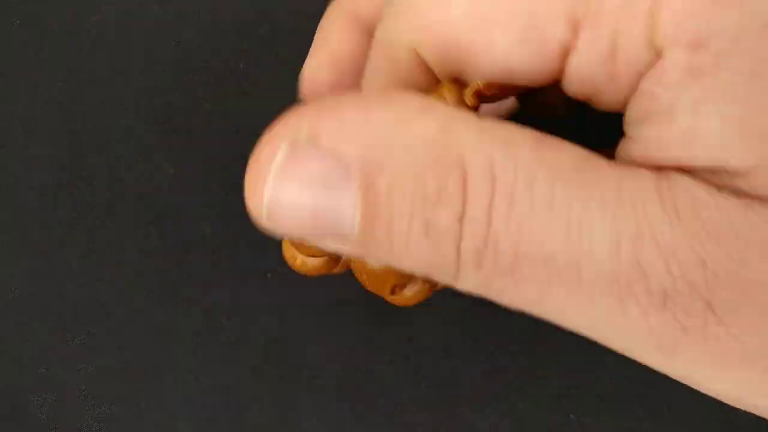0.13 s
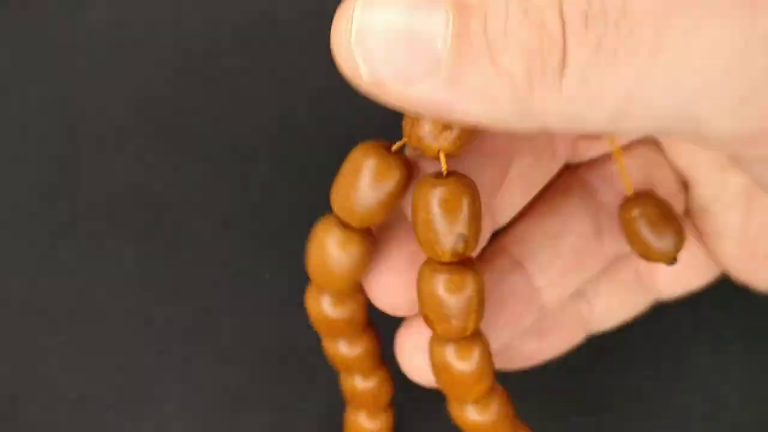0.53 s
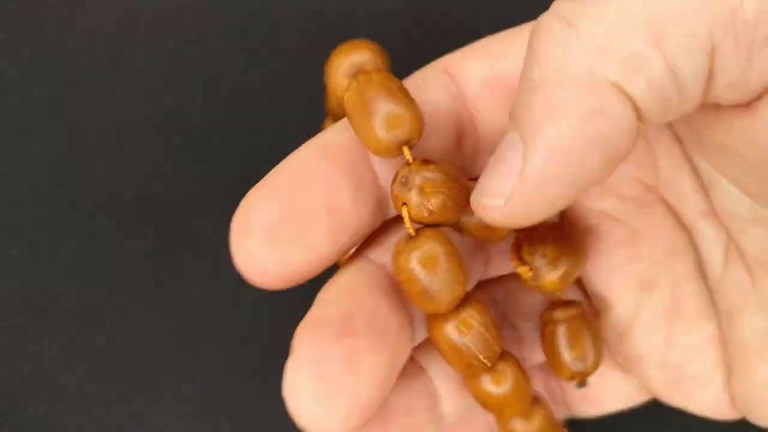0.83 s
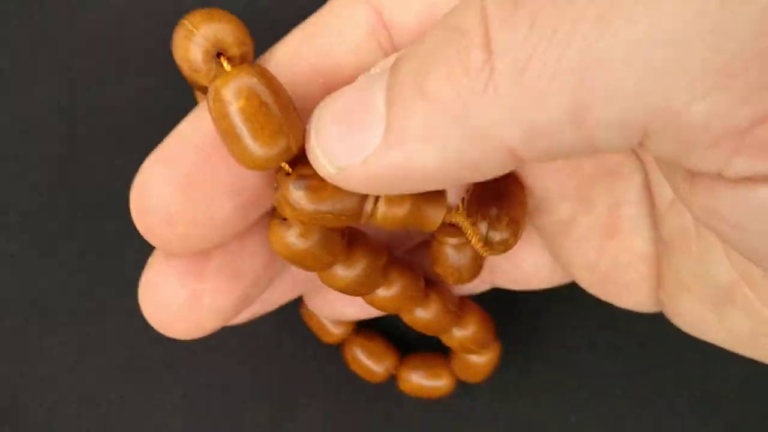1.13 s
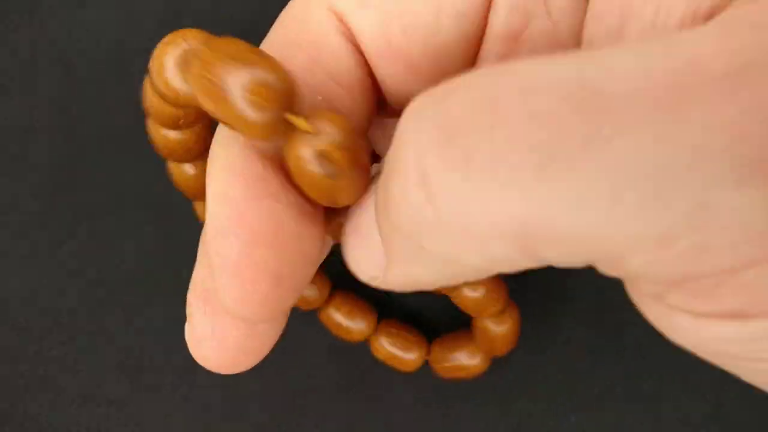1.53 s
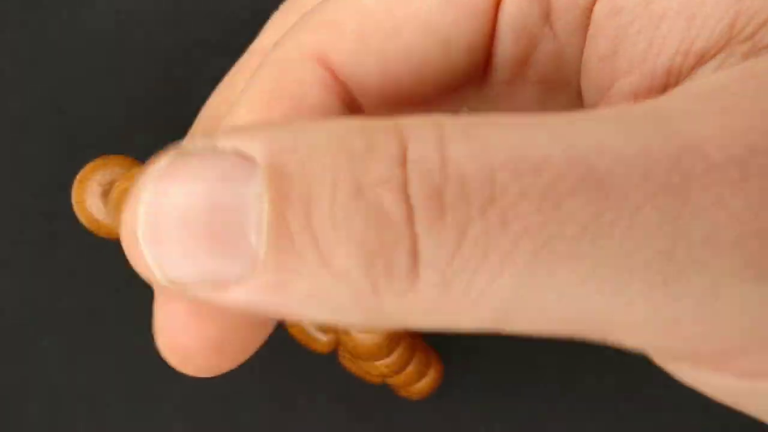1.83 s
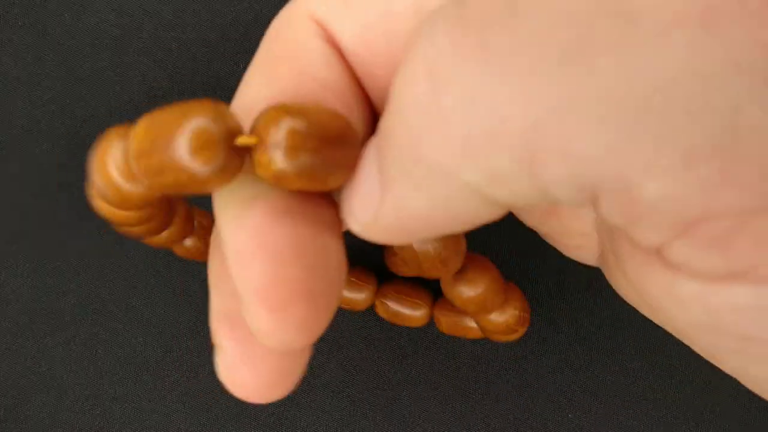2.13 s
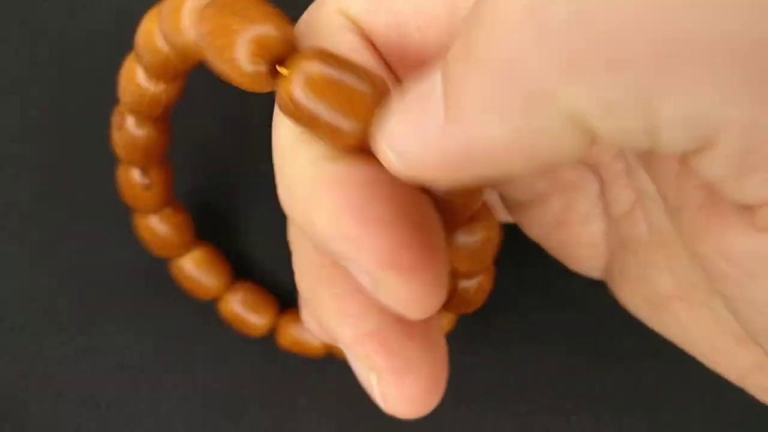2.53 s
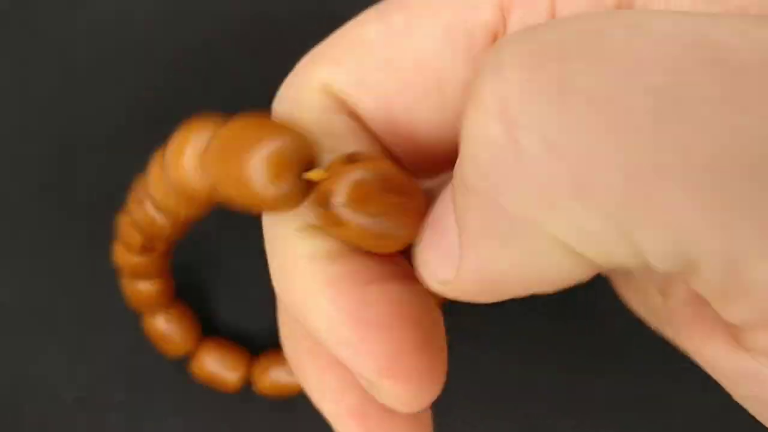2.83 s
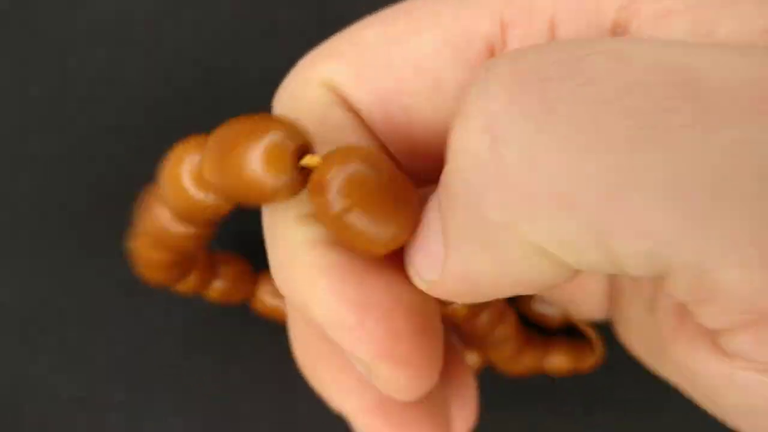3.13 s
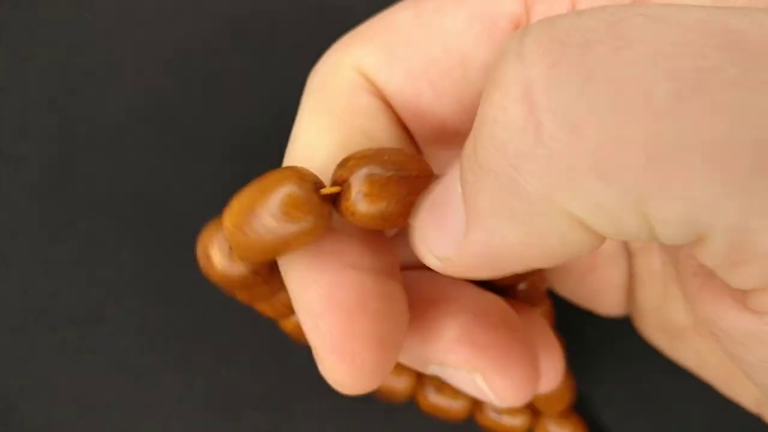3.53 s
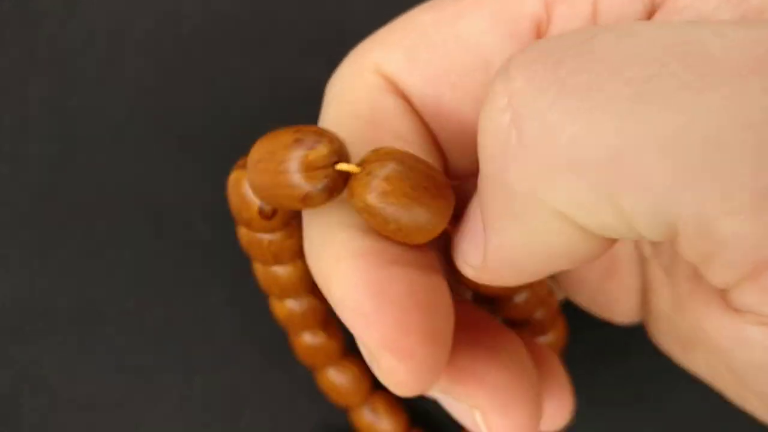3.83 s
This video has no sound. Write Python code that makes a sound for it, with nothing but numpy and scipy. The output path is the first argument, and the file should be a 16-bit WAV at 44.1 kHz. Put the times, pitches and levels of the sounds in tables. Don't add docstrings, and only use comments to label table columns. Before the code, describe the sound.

Polished wooden prayer beads click sharply and irregularly as fingers slide them along a cord.

```python
import sys
import numpy as np
from scipy import signal
from scipy.fft import rfft, irfft, next_fast_len
from scipy.io import wavfile
from scipy.ndimage import map_coordinates

SR = 44100
rng = np.random.default_rng(int(sys.argv[2]) if len(sys.argv) > 2 else 0)


def magnitude_from_level(level_db):
    exponent = np.asarray(level_db, float) / 20
    return 10 ** exponent


def waveform_to_disk(signal):
    frames = np.transpose(np.atleast_2d(signal))
    scaled = np.clip(frames, -1, 1) * 32767
    samples = np.round(scaled).astype(np.int16)
    wavfile.write(sys.argv[1], SR, samples)


N = 176400


def unit(x):
    return x / np.sqrt(np.mean(x ** 2) + 1e-20)


def along(points, hz):
    f, v = np.transpose(points)
    return np.interp(np.log(hz + 1), np.log(f + 1), v)


def wobble(rate):
    knots = rng.standard_normal(int(N * rate / SR) + 4)
    return map_coordinates(knots, [np.arange(N) * rate / SR])


def filtered(x, response):
    m = next_fast_len(N + 8192)
    return irfft(rfft(x, m) * response(np.fft.rfftfreq(m, 1 / SR)), m)[..., :N]


def sides(pan_db):
    return magnitude_from_level(np.array([pan_db / 2, -pan_db / 2]))


def resonances(f, modes):
    total = 0
    for k, (centre, width, db) in enumerate(modes):
        damping = 1j * f * width
        total = total + (-1) ** k * magnitude_from_level(db) * damping / (centre * centre - f * f + damping)
    return total


# f/Hz, level/dB
AIR_COLOUR = [(150, -37.5), (250, -3), (351, -19.5), (692, -7.5), (1920, -8.5), (3090, -9.5), (5310, -20.5),
              (10000, -23), (13000, -58.5), (22000, -120)]
# f/Hz, left over right level/dB
AIR_BALANCE = [(300, 1), (1300, -3.5), (2400, 3), (8000, 2)]


def room_air():
    shared, left, right = rng.standard_normal((3, N))
    alike = 0.2
    common, own = np.sqrt(alike), np.sqrt(1 - alike)
    pair = np.array([common * shared + own * left, common * np.roll(shared, 8) + own * right])
    hush = filtered(pair, lambda f: magnitude_from_level(along(AIR_COLOUR, f)) * sides(along(AIR_BALANCE, f)))
    return magnitude_from_level(-71 + wobble(26)) * unit(hush)


# f/Hz, width/Hz, level/dB
HUM_MODES = [(58, 21, -2), (108, 25.1, -3), (130.5, 22.2, -2.5), (215.2, 4.4, -7), (275, 8.4, -25.5)]
# t/s, level/dB
TREMBLE_LEVEL = [
    (0, -67),
    (4, -67.5),
]


def tremble():
    shakes = rng.standard_normal((2, N)) * magnitude_from_level(1.9 * wobble(8.7))

    def table(f):
        return resonances(f, HUM_MODES) / (1 + (f / 330) ** 4) * f ** 2 / (f ** 2 + 45 ** 2)

    both, apart = filtered(shakes, table)
    pair = np.array([both + 0.34 * apart, both - 0.31 * apart])
    t, db = np.transpose(TREMBLE_LEVEL)
    level = magnitude_from_level(np.interp(np.arange(N) / SR, t, db))
    return magnitude_from_level(4.5) * level * unit(pair)


def bead_forces(t, f, noise, nudge):
    chatter_t60, linger_t60 = 0.0051, 0.025
    hit = magnitude_from_level(-60 * t / chatter_t60) * (noise[0] + 8 * (t == 0))
    far = 0.11 * hit + 0.37 * magnitude_from_level(-35 * t / chatter_t60) * noise[1]
    linger = magnitude_from_level(-14.5 - 60 * t / linger_t60) * noise[1:]
    force = rfft(np.array([hit, far]) + linger, 2 * len(t))

    def late(seconds):
        return np.exp(-2j * np.pi * f * seconds)

    near_path = 1 + magnitude_from_level(-5.5) * late(0.000395 * (1 + 0.15 * nudge[0]))
    far_path = 0.19 + late(0.00044 * (1 + 0.22 * nudge[1]))
    return force * [near_path, far_path]


# f/Hz, width/Hz, level/dB
WOOD_MODES = [(1665, 550, 2), (2260, 730, -2.5), (3550, 877, 3.5), (4233, 345, 3), (5118, 785, 4.5),
              (6200, 2570, -0.5)]


def wood_response(f, pitch):
    def favoured(p):
        loss_db = 15
        return resonances(f, [(c, w, db - loss_db * np.log2(c / p) ** 2) for c, w, db in WOOD_MODES])

    body = resonances(f, [(1326, 1000, -19.5)])
    return (np.array([favoured(pitch), favoured(0.45 * pitch)]) + body) * (f / (f + 500)) ** 2


# f/Hz, width/Hz, level/dB
SHELL_MODES = [(7830, 1670, -3.5), (9830, 1920, 1.5), (11110, 1950, 1.5), (15180, 1000, -10)]


def shell_response(f, nudge):
    modes = [(c * (1 + 0.03 * u), w, db) for (c, w, db), u in zip(SHELL_MODES, nudge)]
    return resonances(f, modes) * (f / (f + 5000)) ** 2


# f/Hz, t60/s
ROOM_T60 = [(500, 0.14), (2600, 0.35), (7000, 0.15), (14000, 0.22)]


def room(x):
    hz, t, z = signal.stft(rng.standard_normal((2, 4096 * 3)), SR, nperseg=256)
    fading = z * magnitude_from_level(-60 * t / along(ROOM_T60, hz)[:, None])
    tail = signal.istft(fading, SR, nperseg=256)[1]
    gap = 0.00058
    tail = tail * np.clip(np.arange(tail.shape[1]) / SR / gap, 0, 1) ** 2
    tail = tail / np.linalg.norm(tail[0])
    return signal.fftconvolve(x[None], tail, axes=1) * sides(7.5)[:, None]


# t/s, peak level/dB, wood pitch f/Hz, brightness/dB, left over right level/dB
FIRM_CLICKS = [(0.2721, -19.5, 4730, 15, 7), (0.3229, -20, 6000, -3, 16), (0.3323, -14.5, 6800, 16, 29),
               (0.3496, -29.5, 5540, -4, 5.5), (0.3644, -26, 4400, 7, 9), (0.3717, -30.5, 6900, -13, 40),
               (0.7956, -24.5, 2630, -2, 11), (0.8528, -25, 7200, -3, 20), (0.9267, -25, 6200, -2, 18),
               (2.0346, -23, 5940, -8.5, 13), (2.0379, -27, 5640, 5, 1), (2.4117, -9, 5650, 1.5, 24),
               (2.7208, -17, 3800, -5.5, 23), (2.7896, -22, 6200, 3, 15), (2.8668, -19.5, 4900, 10.5, 19),
               (2.8729, -30, 3180, 13, 17), (3.0398, -9.5, 4020, 2.5, 19), (3.0538, -20, 4950, -4, 7.5),
               (3.3945, -12, 4200, -4, 16), (3.7004, 0.5, 5400, -2, 17.5), (3.8069, -27, 6130, 7, 19)]
# t/s, peak level/dB, wood pitch f/Hz, brightness/dB
LIGHT_CLICKS = [(0.0406, -33, 6500, -7.5), (0.2741, -34, 5530, -8), (0.338, -26.5, 3500, 6),
                (0.354, -33, 5000, 4), (0.3567, -32, 4500, 2), (0.3752, -25, 3960, 4.5),
                (0.394, -28, 7340, -2.5), (0.396, -29, 6000, -1), (0.6621, -28, 4100, -5),
                (0.6793, -40, 3180, -27), (0.9565, -38.5, 3670, -12), (1.1716, -40.5, 4130, -14),
                (1.2773, -43.5, 3520, -6), (1.5038, -32.5, 3800, -40), (1.5859, -34.5, 5400, -14),
                (1.592, -36.5, 5100, -24), (2.0951, -41.5, 2300, -28), (2.768, -37.5, 2530, -8),
                (2.827, -39, 6770, 0.5), (3.0137, -40.5, 4120, -9), (3.033, -37, 7050, 1),
                (3.4392, -30.5, 3270, 4.5), (3.7275, -19, 4870, 10.5), (3.742, -29.5, 4500, -3.5),
                (3.81, -33, 6240, -10)]
# t/s, peak level/dB, wood pitch f/Hz
FAINT_TICKS = [(0.044, -35.5, 4000), (0.2077, -48, 4500), (0.6481, -41.5, 6100), (0.7347, -41, 1830),
               (0.741, -46, 4230), (1.2947, -45.5, 3300), (1.54, -42.5, 3940), (2.169, -67.5, 2280),
               (2.5178, -49.5, 2830), (2.6211, -46.5, 3420), (2.9769, -43, 5530), (3.22, -42, 6900)]


def bead_clicks():
    out, size = np.zeros((2, N + SR)), 1536
    t, f = np.arange(size) / SR, np.fft.rfftfreq(2 * size, 1 / SR)
    light_pan_db, tick_bright_db, shade_db = 14.5, -7.5, 30
    rows = list(FIRM_CLICKS)
    rows += [(*row, light_pan_db) for row in LIGHT_CLICKS]
    rows += [(*row, tick_bright_db, light_pan_db) for row in FAINT_TICKS]
    for s, db, pitch, bright_db, pan_db in rows:
        noise, nudge = rng.standard_normal((3, size)), rng.standard_normal(6)
        force = bead_forces(t, f, noise, nudge[4:])
        wood = irfft(force * wood_response(f, pitch))[:, :size]
        shell = irfft(force * shell_response(f, nudge))[:, :size]
        pair = np.array([unit(wood[c]) + magnitude_from_level(bright_db - c * shade_db) * unit(shell[c]) for c in range(2)])
        left, right = magnitude_from_level(db) * pair / np.abs(pair[0]).max() * magnitude_from_level([[0], [-pan_db]])
        start = round(s * SR) - 2
        push = magnitude_from_level(db - 42.5 - 60 * t / 0.018)
        out[0, start:start + size] += left + push
        out[1, start + round(0.00018 * SR):][:size] += right
        wet = magnitude_from_level(-10) * room(left * magnitude_from_level(-60 * t / 0.00089))
        out[:, start:start + wet.shape[1]] += wet
    return out[:, :N]


# middle t/s, length/s, # level/dB
RUB_STROKES = [(0.158, 0.096, -68), (0.467, 0.17, -66.5), (0.699, 0.1, -72), (1.185, 0.18, -68.5),
               (1.56, 0.047, -56.5), (1.757, 0.18, -74), (2.083, 0.037, -61.5), (2.49, 0.16, -65),
               (2.747, 0.063, -56), (3.196, 0.096, -73), (3.435, 0.042, -67.5), (3.55, 0.31, -76.5),
               (3.68, 0.036, -73)]
# f/Hz, level/dB
SKIN_COLOUR = [(5000, -120), (8000, -26), (11000, -5), (15500, 0.5)]


def skin_rub():
    grain = rng.standard_normal((2, N)) * magnitude_from_level(0.96 * wobble(40) + 0.7 * wobble(220))
    rub = unit(filtered(grain, lambda f: magnitude_from_level(along(SKIN_COLOUR, f)))) * sides(7)[:, None]
    t = np.arange(N) / SR
    level = magnitude_from_level(-73.5)
    for s, length, db in RUB_STROKES:
        level = level + magnitude_from_level(db) * np.exp(-(2 * (t - s) / length) ** 2)
    return level * rub


# t/s, peak level/dB, damping by the resting hand/dB
HAND_BUMPS = [(0.18, -38.5, -10), (0.209, -37, -16), (0.25, -35, -16), (0.266, -30, -19), (0.61, -45, -3),
              (0.628, -40, -14), (0.705, -42, -8), (0.94, -42.5, -23), (1.559, -48, -16), (2.099, -45, -18),
              (2.202, -43.5, -14), (2.5, -50, -8), (2.625, -41, -21), (2.758, -47.5, -20),
              (2.786, -42, -14), (2.865, -44.5, -5), (3.057, -31.5, -10.5), (3.271, -55, 1),
              (3.416, -43.5, -10), (3.472, -45, -2.5), (3.509, -49.5, -13), (3.558, -48.5, -8.5),
              (3.743, -49.5, -9)]
# f/Hz, level/dB, t60/s
TABLE_MODES = [(62.6, -37, 0.24), (105.8, 1.5, 0.13), (129.9, -3, 0.22), (207, -18.5, 0.28),
               (307, -14.5, 0.073)]


def table_bumps():
    out, t = np.zeros(N + SR), np.arange(SR // 3) / SR
    hz, mode_db, t60 = np.transpose(TABLE_MODES)[..., None]
    for s, db, damping_db in HAND_BUMPS:
        uneven_db = 2.4 * rng.standard_normal((5, 1))
        fade = magnitude_from_level(mode_db + uneven_db - 60 * t / (t60 * magnitude_from_level(damping_db / 4)))
        notes = (fade * np.sin(2 * np.pi * hz * t)).sum(0)
        out[round(s * SR):][:len(t)] += magnitude_from_level(db + 2) * notes * (1 - np.exp(-t / 0.0091))
    return out[:N]


# t/s, level/dB
KNUCKLES = [(0.1817, -27), (0.203, -32), (.2535, -19), (.2625, -22), (.277, -27), (0.61, -25.5),
            (.628, -30), (.654, -27.5), (0.7059, -21.5), (2.099, -33), (2.625, -34.5), (2.757, -34),
            (2.787, -27), (2.868, -30.5), (3.056, -18.5), (3.277, -31), (3.416, -39), (3.472, -35),
            (3.563, -35)]
# f/Hz, width/Hz, level/dB
KNOCK_MODES = [(434, 145, -7), (975, 420, -0.5), (1440, 1560, -10.5)]


def knuckle_knocks():
    edge, t = np.zeros(N + SR), np.arange(SR // 3) / SR
    for s, db in KNUCKLES:
        tap = 0.059 * rng.standard_normal(len(t)) + (t == 0)
        edge[round(s * SR):][:len(t)] -= magnitude_from_level(db + 9.5 - 60 * t / 0.06) * tap
    return filtered(edge[:N], lambda f: resonances(f, KNOCK_MODES) / (1 + 1j * f / 1600) ** 2)


def scene():
    return bead_clicks() + table_bumps() + knuckle_knocks() + tremble() + room_air() + skin_rub()


def band_limit(x):
    return signal.sosfilt(signal.butter(12, 16950, fs=SR, output="sos"), x)


def record(dry):
    low_hz, left_bass_hz, top_hz = 45, 153, 15900

    def ports(f):
        band = (1j * f / (low_hz + 1j * f)) ** 2 * np.clip((top_hz + 500 - f) / 700, 0.03, 1) ** 2
        return band * np.array([1j * f / (left_bass_hz + 1j * f), 1 + 0 * f])

    x = filtered(dry, ports)
    x = x / (1 + np.abs(x / 0.93) ** 8) ** 0.125
    return band_limit(x)


dry = scene()
out = record(dry)
waveform_to_disk(out)
```